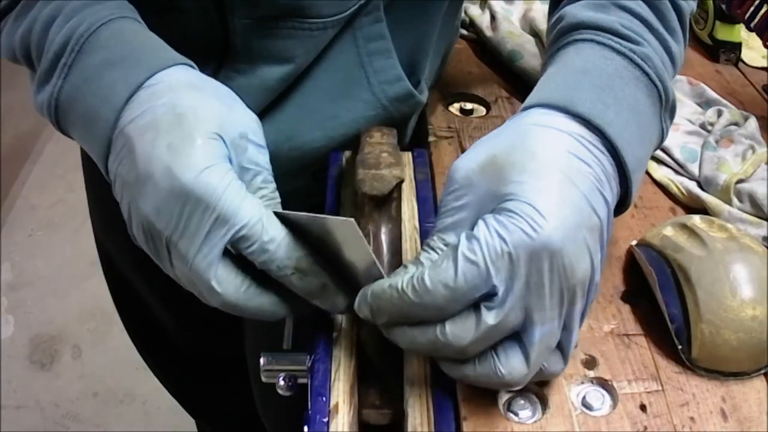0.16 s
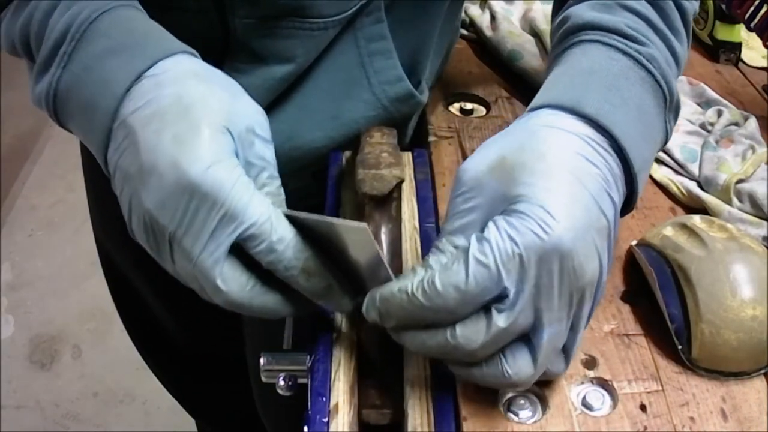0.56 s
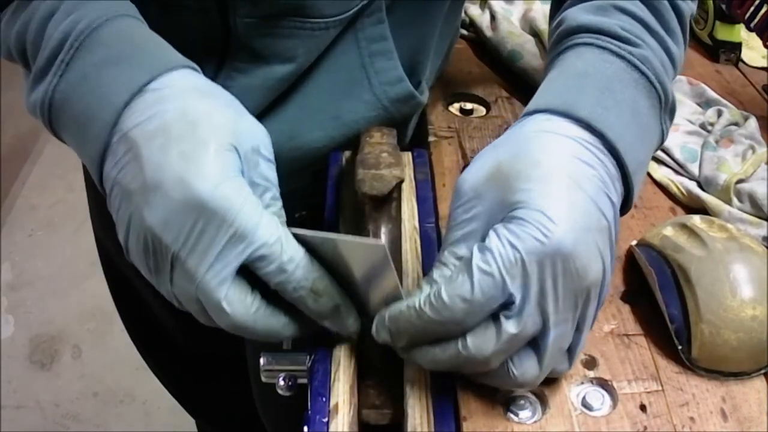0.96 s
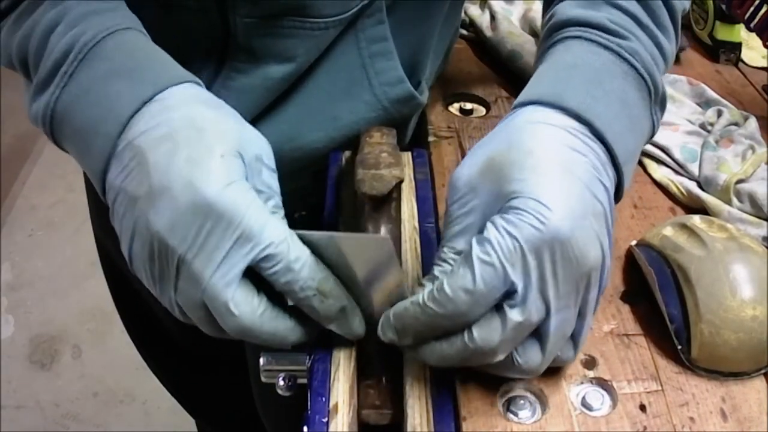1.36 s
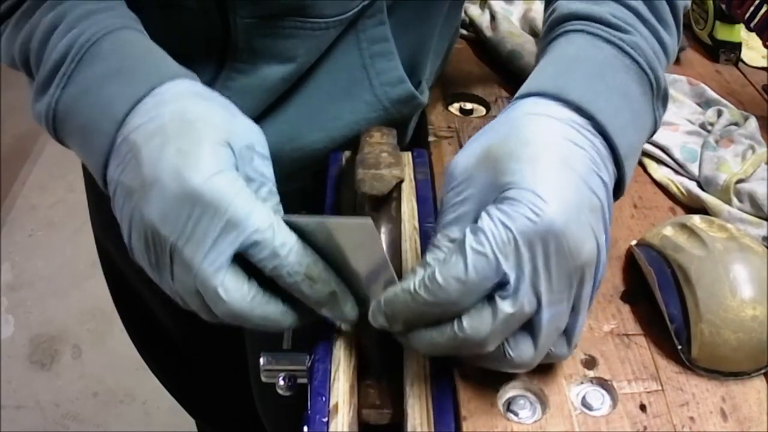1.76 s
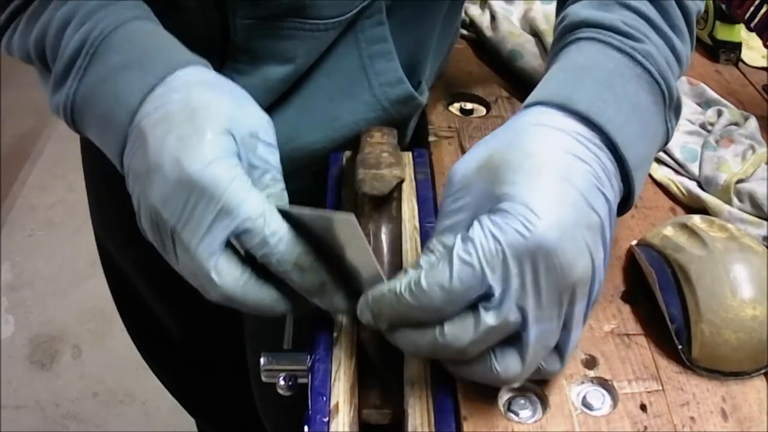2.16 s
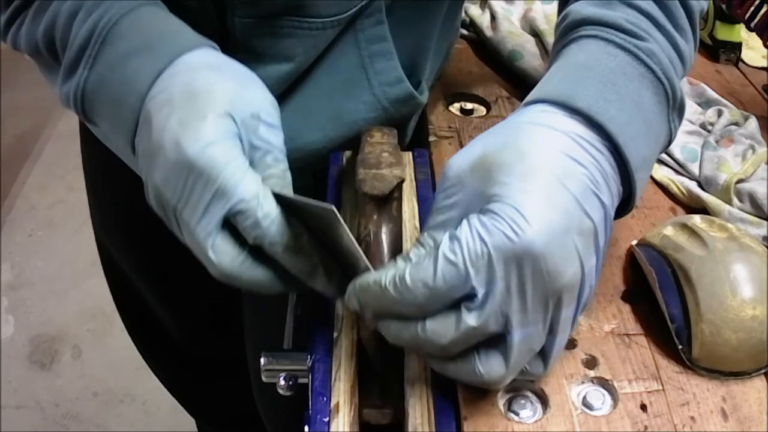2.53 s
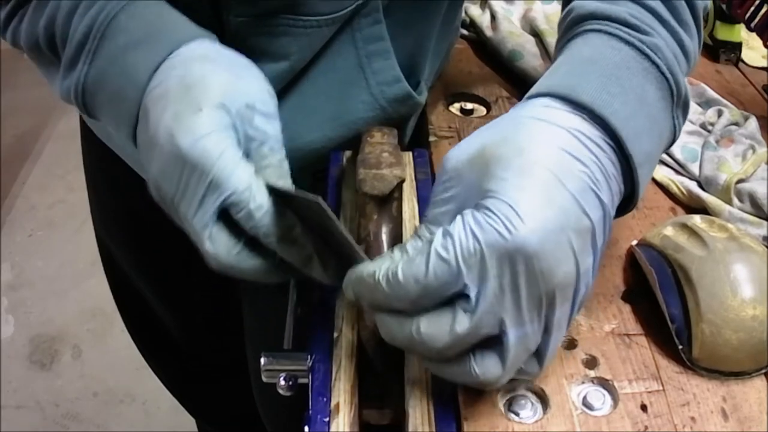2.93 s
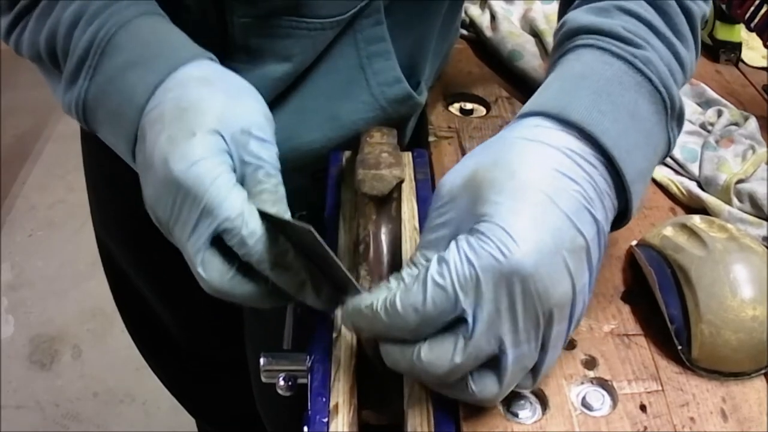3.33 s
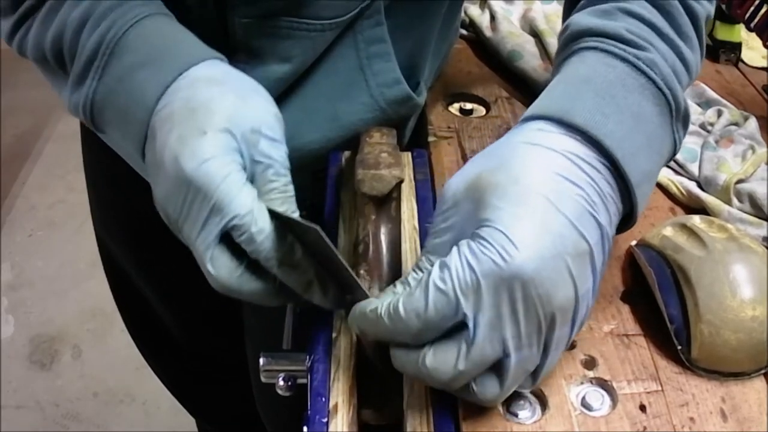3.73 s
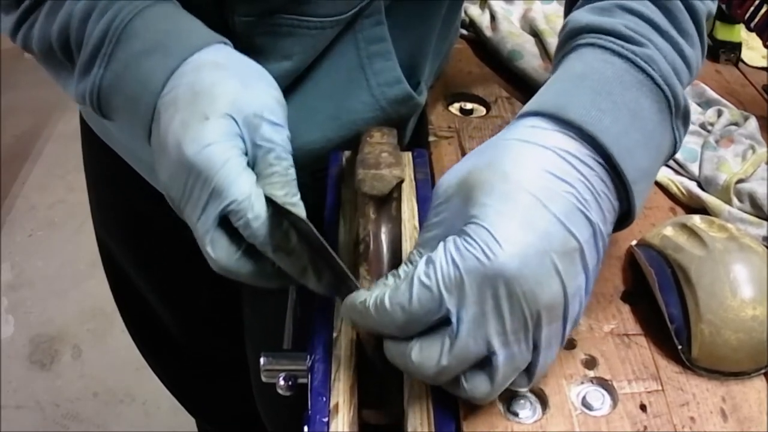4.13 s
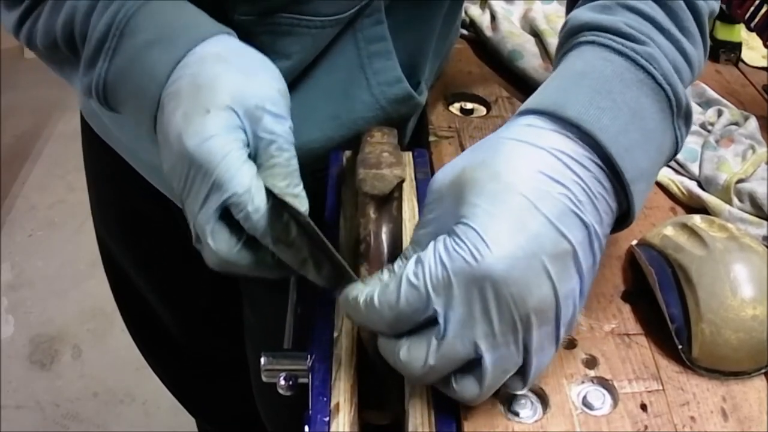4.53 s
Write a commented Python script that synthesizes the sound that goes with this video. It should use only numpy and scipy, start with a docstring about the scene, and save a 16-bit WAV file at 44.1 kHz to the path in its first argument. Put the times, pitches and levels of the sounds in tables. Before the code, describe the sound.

Close to a vise in a small, quiet workshop, a thin steel blade scrapes grime from a wooden handle in an even, quick rhythm. Light taps of the blade on the wood lead into dry, gritty rasps, with little crackles of breaking chips. Midway the edge digs in harder and sounds brighter, then the last strokes ease off. A faint hiss and hum lie behind.

```python
"""Dry, rasping strokes, about three a second: a steel card scraper on an old wooden handle in a vise.
The blade lands with a small knock, then tears through grime: dense tiny fractures ring blade and
handle, the edge bites and chatters, chips snap off. One microphone, close to the vise,
in a small, dry workshop with a quiet hiss and a faint hum behind the work."""
import sys
import numpy as np
from scipy import signal
from scipy.fft import rfft, irfft
from scipy.io import wavfile

SR = 44100
rng = np.random.default_rng(int(sys.argv[2]) if len(sys.argv) > 2 else 0)


def to_wav(sig):
    """Store sig (one row per channel, or 1-D mono) as 16-bit WAV at the path in sys.argv[1].

    Samples outside -1..1 are clipped; the rate is SR.
    """
    pcm = np.clip(np.atleast_2d(sig), -1, 1) * 32767
    pcm = np.round(pcm).astype(np.int16)
    wavfile.write(sys.argv[1], SR, pcm.T)  # frames by channels


N = 206639
TIME = np.arange(N) / SR
RING_TIME = TIME[:4096]
LIGHT_DB = -24.5  # a barely touching edge against a firm one

# Strokes along the handle, with relative levels; gained_db is pressure added during the hold.
# firm_s, held_s, rise_s, level_db, gained_db, hiss_db, body_db, rock_db
STROKE_PLAN = [ (0.125, 0.077, 0.09, -52, -3, -9.5, -1.5, -3.5),
               (0.478, 0.059, 0.041, -44.5, 0.5, -12, -5.5, -1),
               (0.818, 0.069, 0.045, -51, -0.5, -10, -3, 1),
               (1.148, 0.089, 0.047, -48, -2.5, -9.5, -7, -2.5), (1.464, 0.084, 0.055, -49, 1, -9, -9.5, 0),
               (1.82, 0.078, 0.062, -45.5, 2.5, -7.5, -8, 6), (2.168, 0.089, 0.057, -47, 3.5, -8, -7.5, 3),
               (2.526, 0.081, 0.086, -45.5, 3.5, -5.5, -9, -1.5), (2.853, 0.067, 0.06, -44, 0, -4.5, -9, 2),
               (3.168, 0.074, 0.064, -46, 0.5, -5.5, -9.5, 3.5),
               (3.514, 0.078, 0.081, -49, -3, -3.5, -9.5, -2),
               (3.833, 0.088, 0.066, -47.5, -1.5, -3, -9.5, 0.5),
               (4.198, 0.065, 0.11, -53, -2.5, -5, -5.5, -7), (4.545, 0.14, 0.1, -53.5, -3, -6, -7.5, -2), ]


def scraping(body_lag_s=0.0077, body_slope=0.44, hiss_slope=1.15, hiss_bite=1.33):
    """Close up, each stroke tears a stream of fractures: wood answers a light touch, hiss needs force."""
    slip, dig_db = bites()
    tearing = grains(per_s=7000, spread_db=3.5) * slip
    out = np.zeros(N)
    for firm_s, held_s, rise_s, level_db, gained_db, hiss_db, body_db, rock_db in STROKE_PLAN:
        edge_db = pressure(firm_s, held_s, rise_s, gained_db)
        wood_db = pressure(firm_s, held_s + body_lag_s, rise_s, gained_db)  # the wood sounds on a little
        active = wood_db > 2 * LIGHT_DB
        response = fracture(firm_s, rasp_db=1.5, rock_db=rock_db)
        bands = [(200, 1000, body_db - 1.5 + body_slope * wood_db + dig_db),  # wood
                 (1000, 5000, edge_db - 0.5 + dig_db),  # blade
                 (5000, 15000, hiss_db - 1 + hiss_slope * edge_db + hiss_bite * dig_db)]  # fine hiss
        for lo_hz, hi_hz, band_db in bands:
            force = tearing[active] * undb(level_db + band_db[active])
            add(out, TIME[active][0], signal.fftconvolve(force, unit(band(response, lo_hz, hi_hz))))
    return out


def pressure(firm_s, held_s, rise_s, gained_db, lift_s=0.039):
    """Pressure of the edge through one stroke, in dB about its firm level: rise, hold, lift."""
    rising = np.maximum(firm_s - TIME, 0) / rise_s
    holding = np.clip((TIME - firm_s) / held_s, 0, 1)
    lifting = np.maximum(TIME - firm_s - held_s, 0) / lift_s
    return LIGHT_DB * (rising + lifting) + gained_db * (holding - .5)


# The edge digs in: start_s, length_s, extra_db
EDGE_BITES = [(0.527, 0.015, -0.5), (1.156, 0.014, -1.5), (1.201, 0.018, 1.5), (1.853, 0.02, 7.5),
              (1.882, 0.014, 4), (2.214, 0.015, 3.5), (2.246, 0.011, 5), (2.533, 0.016, 5),
              (2.561, 0.0086, 10), (2.887, 0.019, 8), (3.172, 0.024, 2.5), (4.233, 0.0067, 5),
              (4.606, 0.006, 6)]


def bites(chatter_hz=330, depth=0.33, unevenness=0.5, ramp_s=0.0032):
    """Force on the edge, pulsing with uneven stick and slip, and the extra dB of digging in."""
    dig_db = np.zeros(N)
    for start_s, length_s, extra_db in EDGE_BITES:
        inside_s = np.minimum(TIME - start_s, start_s + length_s - TIME)
        dig_db += extra_db * np.clip(inside_s / ramp_s + .5, 0, 1)
    wander = np.repeat(rng.standard_normal(N // 128 + 1), 128)[:N]
    phase = np.cumsum(chatter_hz * np.exp(unevenness * wander)) / SR % 1
    slip = np.exp(-2 * depth * phase)
    return slip / np.sqrt(np.mean(slip ** 2)), dig_db


# Where the edge rides along the handle: time_s, position (-1 to 1)
EDGE_PATH = [(0.1, -0.67), (0.85, -0.23), (1.85, -0.98), (2.55, -0.23), (3.2, 0.14), (3.55, 1), (4.6, 1)]


def fracture(time_s, rasp_db, rock_db=0):
    """One tiny fracture; the place of the edge on the handle decides which modes it drives."""
    _, _, scraped_db, _, travel_db = np.transpose(TOOL_MODES)
    position = np.interp(time_s, *np.transpose(EDGE_PATH))
    mode_db = scraped_db + travel_db * position
    mode_db[0] += rock_db  # the lowest mode is the handle rocking in the jaws
    return ring(mode_db, rasp_db)


# Modes of handle and blade: pitch_hz, half_width_hz, scraped_db, knocked_db, travel_db (per unit position)
TOOL_MODES = [(386, 24, -10, 5, 0), (520, 50, -5, -8, 0), (590, 22, 0, 2, 0), (637, 24, -7, 1, -1),
              (731, 34, -5, -6, -3), (880, 40, -12, 6.5, 4), (948, 80, -12, -12, 3), (1130, 60, -9, -10, 1),
              (1455, 70, 1, 2, 2), (1568, 40, -1, -1, 2), (2015, 110, -1, -10, -2), (2165, 88, -1, 6, -3),
              (2428, 80, -3, 3, -1), (2587, 72, -4, 4, -2), (3045, 60, -7, -13, 2), (3221, 80, -3, -7, 1),
              (3590, 190, -7, -3, -1), (3943, 250, -10, -5, 0), (4340, 130, -6, -7, -1),
              (4888, 300, -14, -5, 0), (5836, 260, -15, -13, -2), (6218, 100, -3, -8, 0),
              (7055, 110, -4, -7, -1), (7451, 280, -15, -12, 0), (8030, 240, -8, -12, 2)]
# Broad colour of the tearing grime: frequency_hz, relative_db
GRIME_RASP = [(80, -36.5), (200, -23), (400, -38), (800, -30), (1200, -15), (1800, -9), (2900, -12.5),
              (4000, -34), (5100, -16), (6500, -11), (8400, -18), (9400, -21), (11300, -19), (13000, -23)]


def ring(mode_db, rasp_db, grip_db=1):
    """Handle and blade answer an impulse: modes over a broad rasp, a little different with every grip."""
    pitch_hz, half_width_hz = np.array(TOOL_MODES).T[:2, :, None]
    height = undb(mode_db + grip_db * rng.standard_normal(len(TOOL_MODES)))[:, None]
    offset_hz = np.fft.rfftfreq(len(RING_TIME), 1 / SR) - pitch_hz
    peaks = height / (1 + (offset_hz / half_width_hz) ** 2)
    rasp = undb(rasp_db) * gains(GRIME_RASP, len(RING_TIME))
    return click(np.sqrt(np.sum(peaks ** 2, axis=0) + rasp ** 2))


# Chips of grime snap off: start_s, peak_db
GRIME_CHIPS = [(0.069, -38), (0.082, -38), (0.116, -31), (0.137, -36.5), (0.167, -44), (0.179, -35),
               (0.195, -36.5), (0.205, -39), (0.49, -36), (0.535, -35), (0.545, -36), (1.224, -35.5),
               (1.239, -38.5), (2.864, -29), (2.89, -35), (2.927, -33.5), (3.231, -32), (3.903, -30),
               (3.91, -41), (4.242, -35.5), (4.647, -48), (4.662, -42)]


def chips(crumble_s=0.0025):
    """A chip breaks off with a few milliseconds of crumbling."""
    out = np.zeros(N)
    for start_s, peak_db in GRIME_CHIPS:
        force = rng.standard_normal(len(RING_TIME)) * np.exp(-RING_TIME / crumble_s)
        ringing = signal.fftconvolve(force, fracture(start_s, rasp_db=8))
        snap = band(ringing, 1200, 10700, order=1)
        add(out, start_s, undb(peak_db) * snap / np.abs(snap).max())
    return out


# The blade meets the handle: start_s, level_db (rms of the first 10 ms), contact_ms, settle_trim_db
BLADE_LANDINGS = [(0.016, -59, 0.96, 0), (0.425, -59.5, 0.29, 8), (0.7866, -48, 0.19, -4),
                  (1.07, -63, 1.1, -1.5), (1.346, -49, 0.42, -3.5), (1.3594, -53.5, 0.72, -1),
                  (1.739, -55.5, 0.29, 5.5), (2.129, -51, 0.43, -3), (2.445, -55, 0.62, 3),
                  (2.766, -44.5, 0.41, -6), (3.091, -45.5, 0.35, -0.5), (3.431, -48.5, 0.37, -3.5),
                  (3.763, -43, 0.24, -15), (4.089, -49, 0.53, 0.5), (4.475, -56.5, 0.47, 1.5),
                  (4.656, -55, 1.5, -7)]


def landings(settle_delay_s=0.006, settle_ms=1.67, settle_db=7, skid_db=-1, skid_s=0.0018):
    """The blade knocks on the handle and skids a moment; the handle settles in the jaws with a thud."""
    out = np.zeros(N)
    knocked_db = np.array(TOOL_MODES)[:, 3]
    skid_shape = RING_TIME * np.exp(-2 * RING_TIME / skid_s)
    for start_s, level_db, contact_ms, settle_trim_db in BLADE_LANDINGS:
        response = band(ring(knocked_db, rasp_db=4), 260, 12000)
        skid = undb(skid_db) * unit(rng.standard_normal(len(RING_TIME)) * skid_shape)
        impact = contact(contact_ms)
        force = impact + signal.fftconvolve(impact, skid)[:len(RING_TIME)]
        knock = signal.fftconvolve(force, response)
        thud = undb(settle_db + settle_trim_db) * signal.fftconvolve(contact(settle_ms), response)
        gain = undb(level_db) / np.std(knock[:SR // 100])
        add(out, start_s, gain * knock)
        add(out, start_s + settle_delay_s, gain * thud)
    return out


def contact(length_ms):
    """Force of one contact: the longer it lasts, the duller the knock."""
    force = RING_TIME ** 2 * np.exp(-3 * np.pi * RING_TIME / (length_ms * 1e-3))
    return force / force.sum()


def return_rub(firm_s=3.265, held_s=0.065, rise_s=0.087, fade_s=0.29, level_db=-60):
    """On one return the blade stays on the wood and rubs lightly, ringing at two pitches."""
    friction = grains(per_s=8900, spread_db=3)
    low, high = (band(friction, hz - 120, hz + 120, order=1) for hz in (1740, 3100))
    rub = low + high + undb(-8) * band(friction, 430, 2400)
    rising = np.maximum(firm_s - TIME, 0) / rise_s
    fading = np.maximum(TIME - firm_s - held_s, 0) / fade_s
    return rub / np.std(rub) * undb(level_db + LIGHT_DB * (rising + fading))


def room(direct, wet_db=-15, t60_s=0.15, gap_s=0.003):
    """Bench and cluttered walls give a short, dull tail, faint this close to the vise."""
    t = TIME[:SR // 2]
    tail = rng.standard_normal(len(t)) * np.exp(-np.log(1000) * t / t60_s) * (t > gap_s)
    dull_tail = unit(band(tail, 110, 6700, order=1))
    return direct + undb(wet_db) * signal.fftconvolve(direct, dull_tail)[:N]


# Room tone of the workshop: frequency_hz, relative_db
ROOM_TONE = [(15, -47), (25, -24), (60, -15.5), (140, -3), (314, -1), (620, -4.5), (917, -6), (1400, -6.5),
             (2230, -8), (3210, -9), (7400, -11.5), (12800, -14.5)]
# Mains hum and a thin electrical whine: pitch_hz, rms_db
HUM_TONES = [(60, -96), (120, -95.5), (12013, -81)]


def workshop(air_db=-62):
    """Even hiss and murky air around the microphone, with faint hum."""
    air = irfft(rfft(rng.standard_normal(N)) * gains(ROOM_TONE, N), N)
    hum = sum(np.sqrt(2) * undb(rms_db) * np.sin(2 * np.pi * (pitch_hz * TIME + rng.random()))
              for pitch_hz, rms_db in HUM_TONES)
    return undb(air_db) * air / np.std(air) + hum


def grains(per_s, spread_db):
    """Dense random impulses, mostly small with a few large ones; rms one."""
    size = undb(spread_db * np.minimum(rng.exponential(size=N), 4))
    impulses = (rng.random(N) < per_s / SR) * size * rng.choice([-1, 1], N)
    return impulses / np.std(impulses)


def click(spectrum):
    """The shortest causal pulse with a given spectrum."""
    cepstrum = irfft(np.log(spectrum))
    cepstrum[1:len(RING_TIME) // 2] *= 2
    cepstrum[len(RING_TIME) // 2:] = 0
    return unit(irfft(np.exp(rfft(cepstrum))))


def gains(outline, size):
    """Gain of a (Hz, dB) outline at each bin of a transform."""
    hz, db = np.transpose(outline)
    bin_hz = np.fft.rfftfreq(size, 1 / SR)
    return undb(np.interp(np.log(bin_hz + 1), np.log(hz), db))


def band(x, lo_hz, hi_hz, order=3):
    """Band-pass filter."""
    return signal.sosfilt(signal.butter(order, [lo_hz, hi_hz], "band", fs=SR, output="sos"), x)


def undb(db):
    """Decibels to gain."""
    return 10 ** (np.asarray(db) / 20)


def unit(x):
    """Scale to an energy of one."""
    return x / np.sqrt(np.sum(x ** 2))


def add(out, start_s, x):
    """Mix x into out from start_s on."""
    i = int(start_s * SR)
    out[i:i + len(x)] += x[:N - i]


def scene():
    """The work at the vise on one close microphone, in the quiet shop."""
    work = scraping() + chips() + landings() + return_rub()
    return (room(work) + workshop())[None]


def record(dry, top_hz=12750):
    """The recorder cuts the top off steeply."""
    return signal.sosfilt(signal.ellip(10, .2, 60, top_hz, fs=SR, output="sos"), dry)


dry = scene()
out = record(dry)
to_wav(out)
```